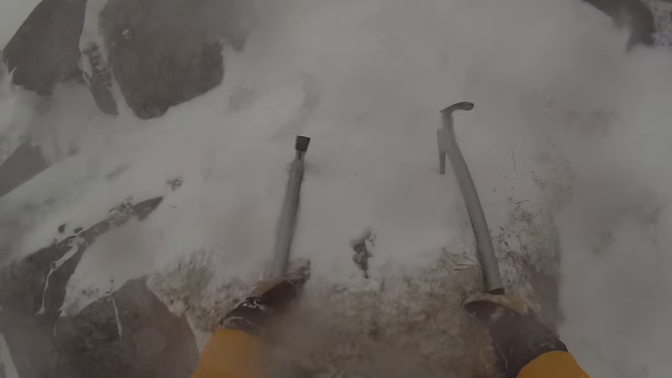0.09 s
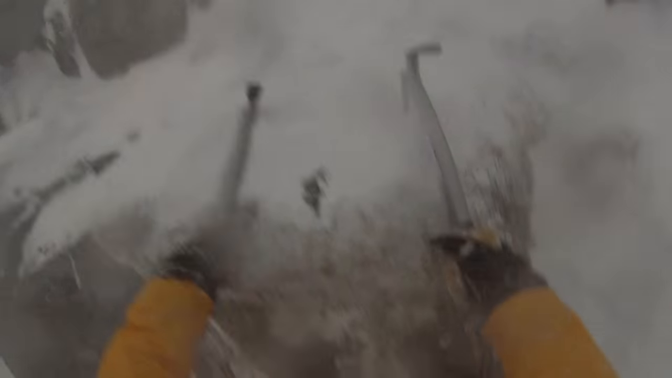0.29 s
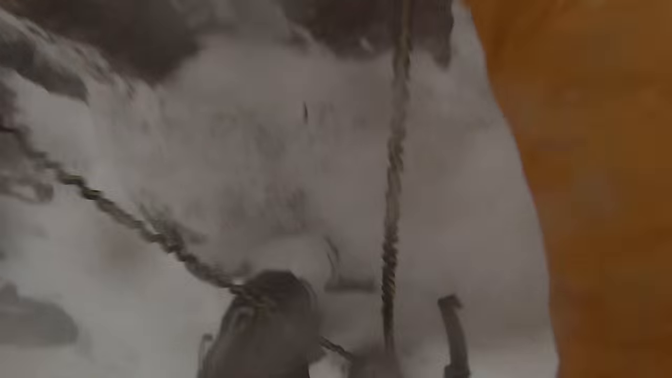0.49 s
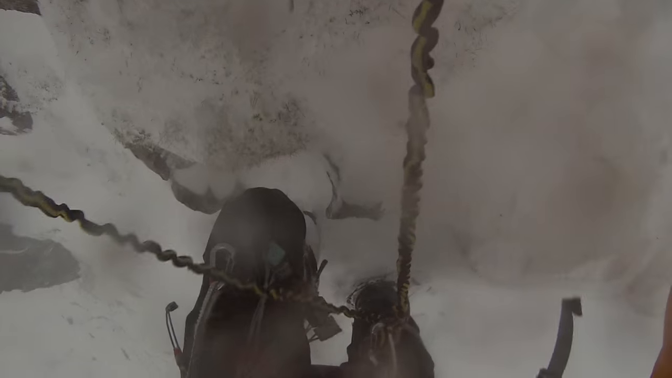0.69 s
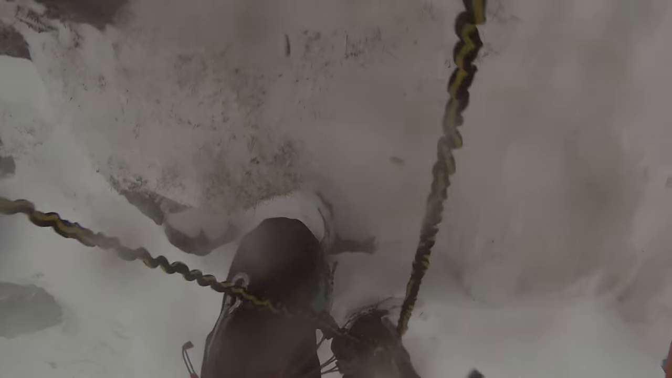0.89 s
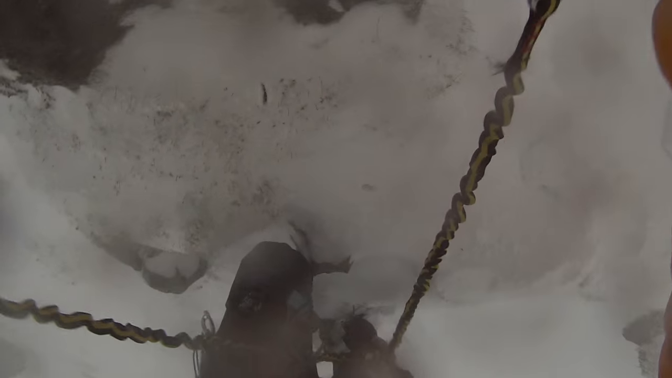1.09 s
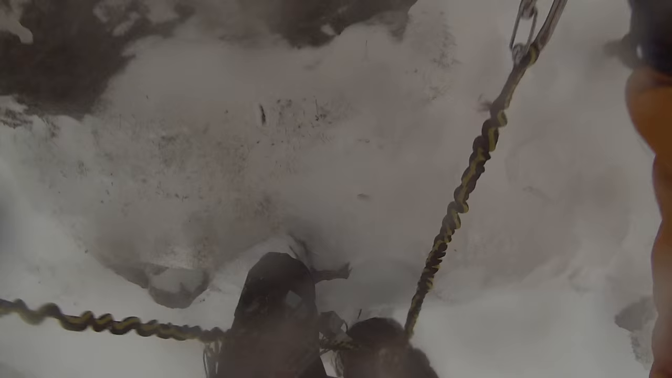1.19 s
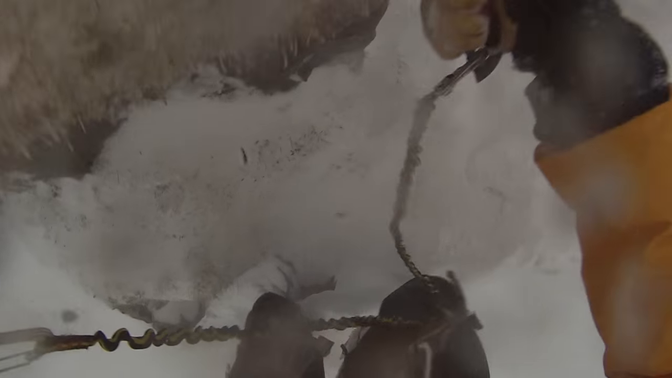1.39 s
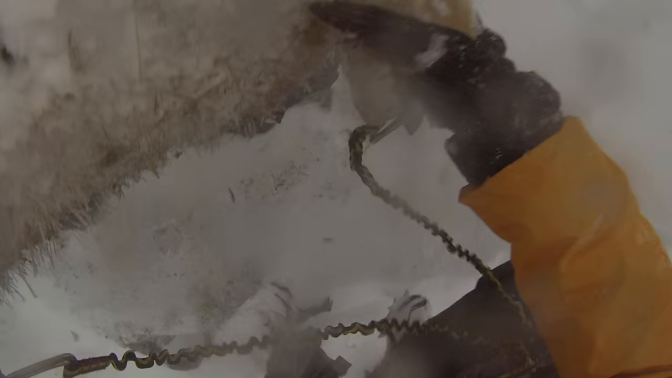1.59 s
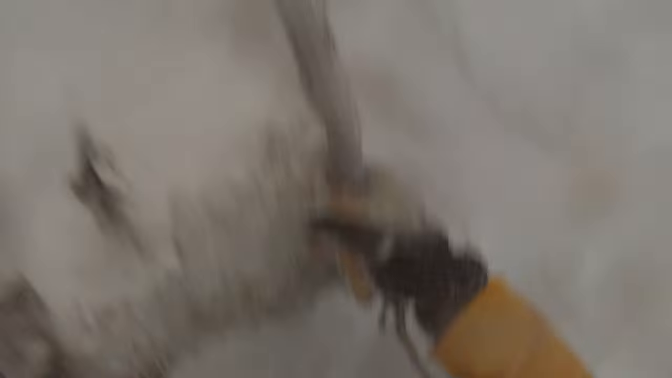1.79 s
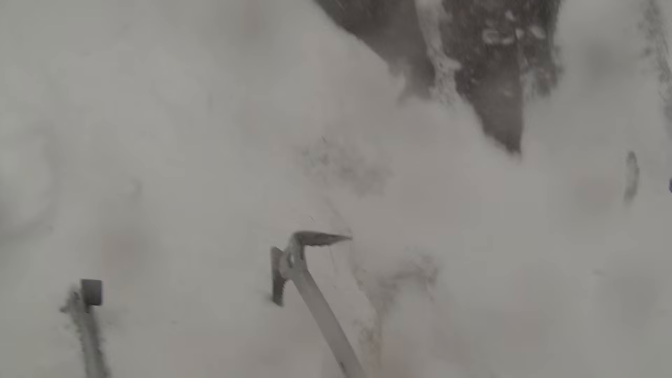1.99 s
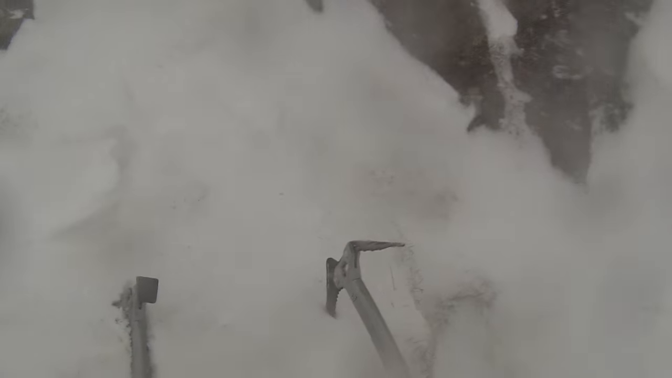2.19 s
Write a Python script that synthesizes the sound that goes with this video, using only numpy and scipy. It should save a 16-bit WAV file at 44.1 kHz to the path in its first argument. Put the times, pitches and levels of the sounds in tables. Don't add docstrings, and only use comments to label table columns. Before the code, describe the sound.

A climber's heavy jacket rubs and crackles with ice; one strong thud and crunch comes early, scattered snaps in the middle, a weaker double crunch near the end, with low wind buffeting a dry, boxy helmet microphone.

```python
import sys
import numpy as np
from scipy import signal
from scipy.fft import rfft, irfft, next_fast_len
from scipy.io import wavfile
from scipy.ndimage import map_coordinates

SR = 44100
rng = np.random.default_rng(int(sys.argv[2]) if len(sys.argv) > 2 else 0)


def amplitude_ratio(level_db):
    exponent = np.asarray(level_db, float) / 20
    return 10 ** exponent


def log_audio(samples):
    frames = np.atleast_2d(samples).T
    limited = np.clip(frames, -1, 1)
    pcm = np.round(limited * 32767).astype(np.int16)
    wavfile.write(sys.argv[1], SR, pcm)


N = 99225

# (f/Hz, width/Hz, level/dB)
HOUSING_CAVITIES = [(1544, 670, 6.5), (2100, 1190, 2.5), (5160, 850, 1.5), (6700, 1340, -5.5),
                    (10900, 2900, -7.5), (3090, 1500, -1)]
TICK_PITCHES = [1, 1.35, 1.8, 2.3]


def unit(x):
    return x / np.sqrt(np.mean(x ** 2) + 1e-20)


def curves(rows):
    s, *cols = np.transpose(rows)
    return [np.interp(np.arange(N) / SR, s, c) for c in cols]


def wobble(rate):
    knots = rng.standard_normal(int(N * rate / SR) + 4)
    return map_coordinates(knots, [np.arange(N) * rate / SR])


def filtered(x, response):
    m = next_fast_len(N + SR // 2)
    return irfft(rfft(x, m) * response(np.fft.rfftfreq(m, 1 / SR)), m)[..., :N]


def colour(points):
    f, db = np.transpose(points)
    return lambda hz: amplitude_ratio(np.interp(np.log(hz + 1), np.log(f + 1), db))


def peak(f, centre_hz, width_hz):
    return 1j * f * width_hz / (centre_hz ** 2 - f * f + 1j * f * width_hz)


def add(track, s, piece):
    track[round(s * SR):][:len(piece)] += piece


def housing(f):
    return sum((-1) ** k * amplitude_ratio(db) * peak(f, c, w) for k, (c, w, db) in enumerate(HOUSING_CAVITIES))


def grains(rate, spread_db, smooth):
    chance = rate / SR * amplitude_ratio(3.5 * np.clip(wobble(60), -3, 1.6))
    size = amplitude_ratio(spread_db * np.minimum(rng.exponential(size=N), 3))
    size = size * np.sign(rng.standard_normal(N))
    breaks = unit(size * (rng.random(N) < chance))
    return unit(breaks + smooth * rng.standard_normal(N))


def rustle():
    # (t/s, level/dB)
    rub_levels = [(0, -49), (.07, -53.5), (.2, -47), (.26, -52.5), (.37, -54.5), (.5, -42.5), (.62, -55),
                  (.72, -65), (.83, -60.5), (.9, -55.5), (1.12, -52), (1.16, -53.5), (1.5, -48.5),
                  (1.66, -55), (1.74, -62.5), (1.96, -43), (2.12, -60.5), (2.2, -47.5)]
    # (t/s, level/dB)
    crackle_levels = [(0, -44.5), (.11, -54.5), (.2, -45), (.34, -54), (.45, -45), (.72, -60), (.77, -55.5),
                      (.87, -48.5), (1.1, -54.5), (1.34, -49.5), (1.42, -56.5), (1.5, -47.5), (1.67, -56.5),
                      (1.74, -68), (1.87, -51), (2.07, -57), (2.11, -64), (2.25, -47)]
    # (t/s, length/s, lift/dB)
    sleeve_folds = [(0.088, 0.021, 2), (0.267, 0.0068, -5), (0.574, 0.045, 2), (0.994, 0.031, 4),
                    (1.093, 0.073, 5), (1.168, 0.061, 6.5), (0.197, 0.049, 2), (0.454, .04, 0),
                    (1.29, 0.045, 0), (1.37, .04, 0.5), (1.507, 0.02, 3), (2.002, .012, 12),
                    (1.935, .03, 0), (1.315, 0.038, 3.5), (1.55, 0.033, 3.5), (1.649, 0.04, 3.5),
                    (1.787, 0.04, 6), (1.844, 0.048, -3), (1.872, 0.021, 5.5), (2.076, 0.0087, 8),
                    (2.15, 0.036, -5.5), (0.82, 0.059, -3.5), (1.119, 0.015, -4.5)]
    # (f/Hz, level/dB)
    cloth_tone = [(150, -20.5), (850, -19.5), (1050, -4.5), (1230, -10.5), (1400, 0.5), (1800, -2),
                  (2400, -5), (3000, -14.5), (5000, -62)]
    t = np.arange(N) / SR
    rub_db, = curves(rub_levels)
    crackle_db, = curves(crackle_levels)
    for s, length, db in sleeve_folds:
        crackle_db = crackle_db + db * np.exp(-(2 * (t - s) / length) ** 4)

    body = unit(filtered(grains(700, spread_db=4.5, smooth=0.67), colour(cloth_tone)))
    broad = grains(900, spread_db=4.5, smooth=0.52)
    broad = unit(filtered(broad, lambda f: housing(f) * peak(f, 6030, 10800)))
    tuned = np.zeros(N)
    for c, w, db in HOUSING_CAVITIES[2:]:
        tuned += amplitude_ratio(db) * filtered(grains(400, spread_db=7.5, smooth=0.36), lambda f: peak(f, c, w))

    rub = amplitude_ratio(rub_db + 2.7 * wobble(18)) * body
    crackle = amplitude_ratio(crackle_db + 1.02 * wobble(44.87)) * (1.063 * broad + 0.65 * unit(tuned))
    return rub + crackle


def wind():
    # (t/s, level/dB)
    gust_levels = [(0.0, -45), (0.03, -46), (0.24, -33.5), (0.44, -57), (0.48, -40), (0.78, -56),
                   (0.83, -51.5), (1.35, -45.5), (1.57, -55.5), (1.63, -46), (1.68, -57), (1.87, -40),
                   (1.93, -37), (2.0, -37.5), (2.13, -58), (2.25, -44)]
    # (f/Hz, level/dB)
    air_tone = [(15, -2.5), (35, -2.5), (70, -15), (160, -32), (300, -37), (900, -42), (2000, -68),
                (14000, -99)]
    # (f/Hz, level/dB)
    slope_tone = [(120, -17), (250, -3), (600, -5), (1100, -7), (1600, -11.5), (14000, -31)]
    gust_db, = curves(gust_levels)
    far = unit(filtered(rng.standard_normal(N), colour(slope_tone)))
    near = unit(filtered(rng.standard_normal(N), colour(air_tone)))
    far_db = -66 + 3.0 * wobble(14.74)
    return amplitude_ratio(far_db) * far + amplitude_ratio(gust_db + 2.5 * wobble(11.85)) * near


def mount():
    # (t/s, level/dB)
    shake_levels = [(0, -37.5), (.14, -51), (.19, -31), (.26, -51), (.41, -45), (.49, -33.5), (.57, -57),
                    (.78, -54.5), (.87, -44), (1.01, -48.5), (1.17, -55.5), (1.24, -53.5), (1.44, -50),
                    (1.7, -67.5), (1.9, -37.5), (1.945, -29), (2.03, -48), (2.25, -51.5)]
    # (t/s, peak level/dB, direction, share of free ring time)
    jolts = [(.2418, -6, -1, .75), (.5085, -30.5, 1, 1.3), (.6075, -33.5, -1, 1.1), (1.168, -29.5, -1, .7),
             (1.795, -31, -1, .8), (1.958, -24, 1, .25), (1.9622, -24.5, -1, .22), (1.151, -35, 1, .9),
             (.178, -33.5, 1, 1.5), (1.912, -29.5, -1, .66), (1.9405, -29.5, 1, .45), (.466, -34, 1, 1),
             (.824, -40, 1, .76), (.872, -36.5, 1, .66), (.93, -41, 1, .93), (.42, -40, 1, .8),
             (1.06, -44, 1, .8), (2.09, -43, 1, .9), (1.322, -40, -1, .5), (1.432, -39, 1, .8)]
    # (f/Hz, level/dB, time to fall 60 dB/s)
    mount_rings = [(117, 1.5, 0.14), (71, -38, 0.2), (206, -15, 0.024)]
    out, t = np.zeros(N + SR), np.arange(SR // 4) / SR
    soft_start = 1 - np.exp(-t / 0.0021)
    for s, db, way, free in jolts:
        ring = np.zeros(len(t))
        for hz, level, t60 in mount_rings:
            ring += amplitude_ratio(level - 60 * t / (t60 * free)) * np.sin(2 * np.pi * hz * t)
        add(out, s, amplitude_ratio(db) * np.sign(way) * ring * soft_start)

    shake_db, = curves(shake_levels)
    push = amplitude_ratio(shake_db + 2.1 * wobble(25.35)) * rng.standard_normal((2, N))
    hum = amplitude_ratio(25.0) * filtered(push[0], lambda f: peak(f, 112.6, 21.2) * peak(f, 116, 89))
    low_hum = amplitude_ratio(17) * filtered(push[1], lambda f: peak(f, 78, 30) ** 2)
    return out[:N] + hum + low_hum


def small_breaks(events, cycles, upper_db, gain_db):
    out, t = np.zeros(N + SR), np.arange(SR // 60) / SR
    chances = np.tanh(rng.standard_normal((len(events), 4)))
    for (s, db, hz), luck in zip(events, chances):
        parts = np.zeros(len(t))
        for r, g in zip(TICK_PITCHES, luck):
            strength = 1 if r == 1 else amplitude_ratio(upper_db) * g
            parts += strength * np.sin(2 * np.pi * min(hz * r, 14000) * t)
        fade = amplitude_ratio(db + gain_db - 20 * t * hz / cycles)
        add(out, s + .001, fade * parts * (1 - np.exp(-t * hz)))
    return out[:N]


def creases():
    # (t/s, peak level/dB, f/Hz)
    buckles = [(0.0143, -25.5, 1970), (0.1445, -27, 1700), (0.162, -35, 1970), (0.3723, -34, 1580),
               (0.8455, -37, 2100), (0.8924, -36, 1490), (1.05, -38, 1530), (1.3444, -29, 1660),
               (1.3912, -34, 2000), (1.4486, -37, 2060), (1.5873, -33, 2000), (1.645, -30.5, 1490),
               (1.8128, -32.5, 1650), (1.8612, -38, 1670), (2.156, -35, 1630), (2.2054, -39, 1330)]
    return small_breaks(buckles, cycles=6.0, upper_db=-5, gain_db=0.5)


def snaps():
    # (t/s, peak level/dB, ring f/Hz)
    sharp_breaks = [(.082, -28, 3100), (.162, -25, 2600), (.2663, -25, 6900), (.276, -28, 3600),
                    (.29, -27, 1900), (.393, -27, 2300), (.4787, -25, 5000), (.5003, -25, 5300),
                    (.6274, -25, 2600), (.661, -31, 3000), (.667, -30, 3200), (.7593, -26, 4000),
                    (.7624, -18, 3050), (.7756, -32, 4700), (.7808, -32, 4650), (.9051, -12, 1600),
                    (1.0665, -25, 5200), (1.1343, -30, 2300), (1.1527, -23, 3400), (1.2248, -24, 2200),
                    (1.3073, -26, 3000), (1.4894, -27, 1600), (1.5536, -27, 4600), (1.64, -22, 5300),
                    (1.6262, -33, 8200), (1.6423, -26, 3600), (1.6675, -30, 4900), (1.6812, -20, 1900),
                    (1.7067, -33, 5500), (1.77, -39, 1500), (1.9763, -20, 5300), (2.0004, -27, 3400)]
    # (f/Hz, width/Hz, level/dB, sign)
    shell_rings = [(1600, 500, 3, 1), (2200, 700, 1, -1), (3100, 900, 0, 1), (4950, 1000, -1, 1),
                   (6200, 1200, -6, -1), (8300, 1500, -6, 1), (11200, 1600, -6, 1)]
    ring_cycles, ring_size, spike_size, gain_db = 4, .75, 3.6, -1
    spikes, rings, t = np.zeros(N + SR), np.zeros(N + SR), np.arange(SR // 100) / SR
    for s, db, hz in sharp_breaks:
        burst = .6 * np.sign(rng.standard_normal(len(t))) * amplitude_ratio(-60 * t / .004)
        burst[0] = -spike_size
        add(spikes, s, amplitude_ratio(db + gain_db) * burst)
        fade = amplitude_ratio(db - 20 * t * hz / ring_cycles)
        add(rings, s, -ring_size * fade * np.sin(2 * np.pi * hz * t))

    def shell(f):
        return sum(np.sign(way) * amplitude_ratio(db) * peak(f, c, w) for c, w, db, way in shell_rings)

    both = filtered(spikes[:N], shell) + rings[:N]
    return filtered(both, lambda f: peak(f, 5900, 20000) ** 2 * f / (f + 600))


def ice_ticks():
    # (t/s, peak level/dB, f/Hz)
    crystals = [(0.1944, -30, 5520), (0.2944, -44, 5250), (0.358, -28, 4900), (0.4417, -26, 4580),
                (0.69, -48, 5000), (0.7014, -44, 3840), (0.7414, -26.5, 4090), (0.8205, -31, 5100),
                (0.8254, -32, 5040), (0.8324, -30, 5040), (0.8629, -30, 5060), (0.9284, -35, 4980),
                (0.9802, -31, 4960), (1.051, -28, 5270), (1.1695, -26, 4750), (1.2693, -33, 3660),
                (1.3244, -24, 4700), (1.4052, -38, 4060), (1.4356, -36, 3540), (1.4657, -35, 3510),
                (1.503, -22.5, 7240), (1.5114, -24, 4630), (1.522, -30, 4240), (1.5267, -26, 3540),
                (1.5878, -31, 4050), (1.6693, -30, 3060), (1.7833, -33, 3450), (1.8652, -35, 4020),
                (1.8704, -30, 5040), (1.8951, -31, 4680), (1.916, -24.5, 4750), (1.933, -26, 5250),
                (1.9384, -28, 3700), (1.95, -27, 5310), (2.0144, -32, 4410), (2.0318, -40, 4710),
                (2.0724, -36, 4670), (2.078, -38, 4010), (2.084, -37, 5070), (2.1715, -33, 4780),
                (2.228, -31, 3860)]
    return small_breaks(crystals, cycles=3.9, upper_db=-3.0, gain_db=1.0)


def axe():
    bite_times = [
        .2418,
        1.2165,
        1.907,
        .487,
        .2465,
        1.955,
        1.885,
        .222,
        1.9115,
        .2412,
    ]
    # (peak level/dB, f/Hz, width/Hz)
    bite_sounds = [(-20.5, 1830, 1870), (-34, 1640, 2300), (-26, 690, 1500), (-38.5, 530, 610),
                   (-28, 1400, 810), (-37.5, 620, 1400), (-42.5, 270, 640), (-29.5, 1200, 1800),
                   (-41, 1300, 1800), (-36, 1400, 1700)]
    fall_60db_s, rise_s = 0.019, 0.00065
    out, t = np.zeros(N), np.arange(N) / SR
    for s, (db, hz, width) in zip(bite_times, bite_sounds):
        age = np.maximum(t - s, 0)
        crunch = unit(filtered(rng.standard_normal(N), lambda f: peak(f, hz, width) ** 2))
        out += amplitude_ratio(db - 60 * age / fall_60db_s) * (1 - np.exp(-age / rise_s)) * crunch
    return out


def scene():
    mix = rustle() + wind() + mount() + creases() + snaps() + ice_ticks() + axe()
    return mix[None]


def roll_off(x):
    return signal.sosfilt(signal.butter(12, 16500, fs=SR, output="sos"), x)


def record(dry):
    capsule = colour([(12500, 0), (15000, -2.5), (15300, -1), (16300, -24), (16500, -60)])
    return roll_off(filtered(dry, capsule))


dry = scene()
out = record(dry)
log_audio(out)
```